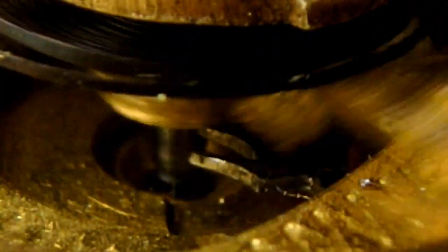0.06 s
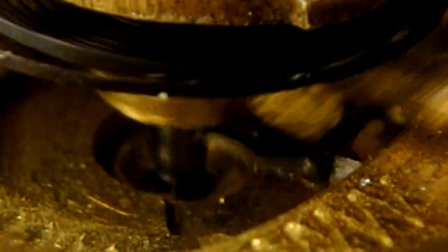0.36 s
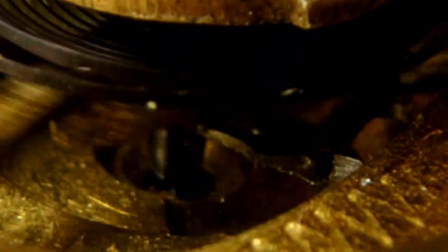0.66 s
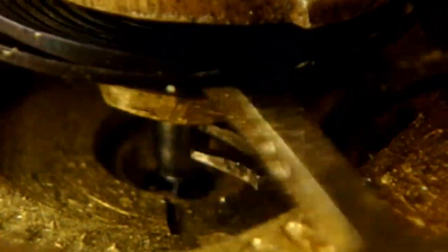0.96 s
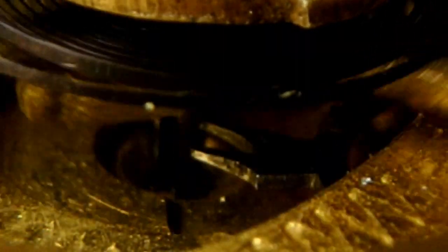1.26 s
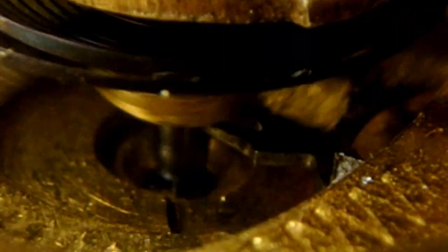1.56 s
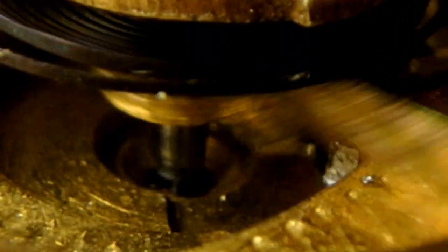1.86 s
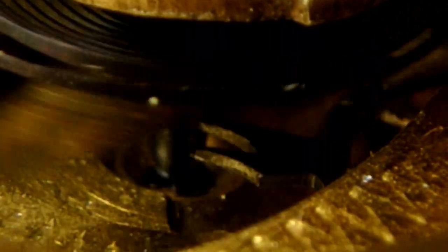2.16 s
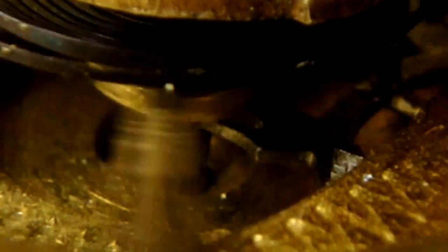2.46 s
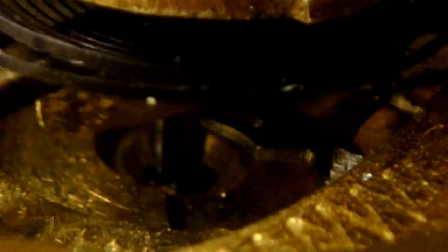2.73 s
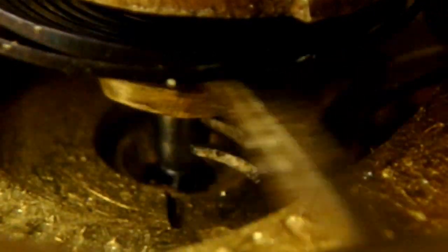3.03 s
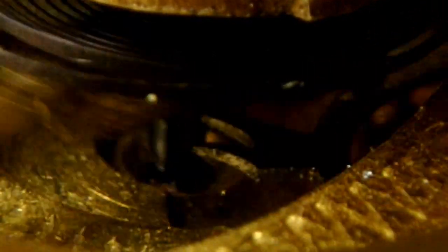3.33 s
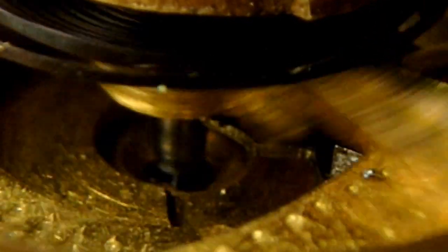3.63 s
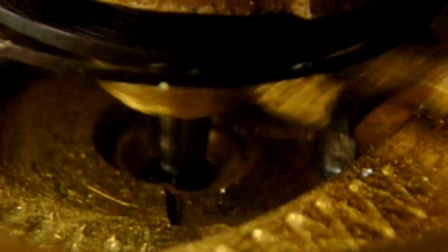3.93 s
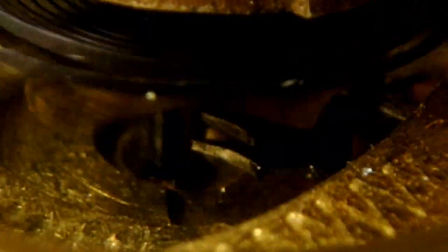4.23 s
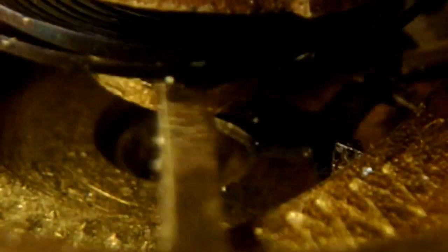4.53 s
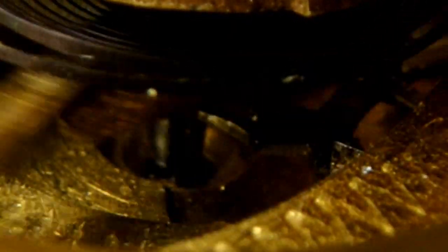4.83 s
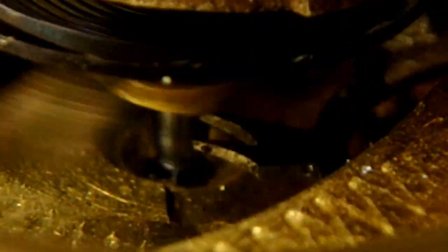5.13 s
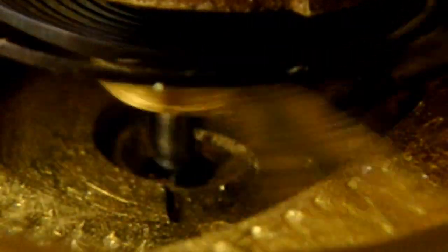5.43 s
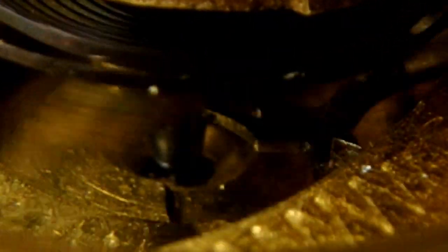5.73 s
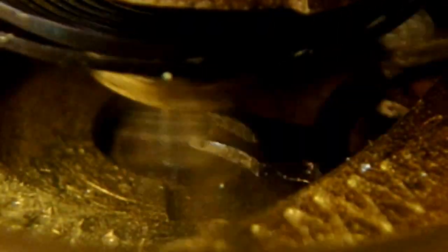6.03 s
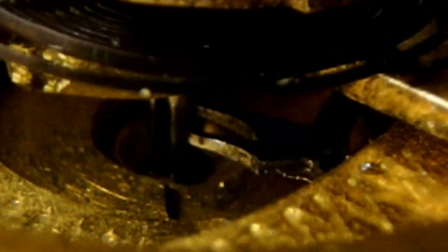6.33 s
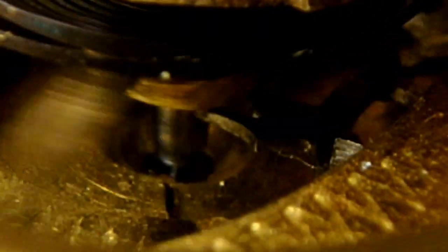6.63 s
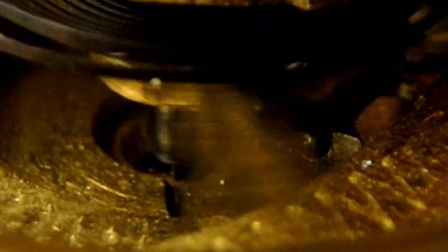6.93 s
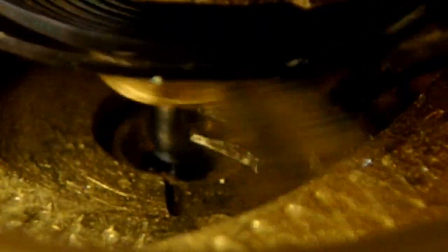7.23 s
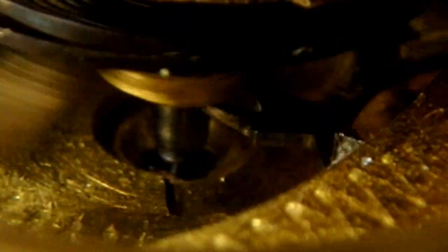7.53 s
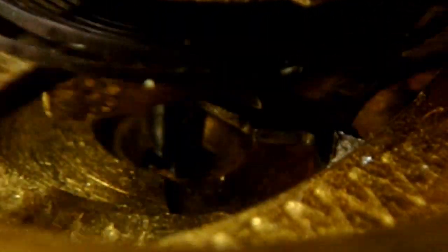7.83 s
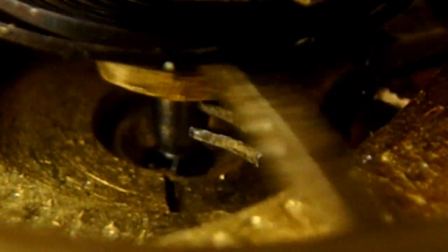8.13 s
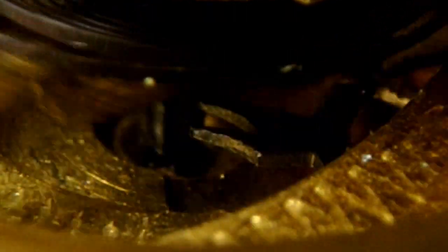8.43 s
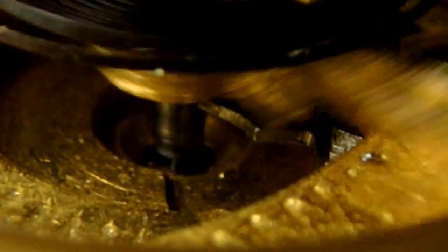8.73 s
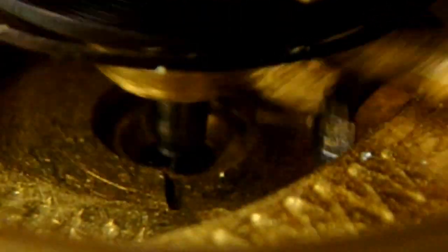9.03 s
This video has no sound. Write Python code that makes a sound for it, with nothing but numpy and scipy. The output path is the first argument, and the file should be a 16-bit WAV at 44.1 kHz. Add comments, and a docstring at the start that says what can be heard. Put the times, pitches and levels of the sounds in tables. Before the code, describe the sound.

Close, rapid ticking from a watch movement runs throughout, bright and metallic, in a repeating pattern of three light ticks, a harder tick and a quick extra click. Behind it is a quiet workshop with steady low hum and hiss. Moving air flutters against the right microphone early on, then bumps it twice past halfway while the watch keeps ticking.

```python
"""A mechanical watch on a workbench ticks close by from the start, about four beats a second, over room
air, hiss and mains hum. Steel strikes steel, the case clacks, the brass plate rings faintly. Three light
beats lead to a hard one that rebounds, then an extra click; the cycle repeats. From 0.8 s strong eddies
of a draught flutter on the right microphone; gusts thump on it at 4.6 and 5.8 s. At 5.9 s the hard beat
falls weak once and its click comes late; the ticking runs on to the end at 9 s."""
import sys
import numpy as np
from scipy import signal
from scipy.fft import rfft, irfft
from scipy.io import wavfile

SR = 44100
rng = np.random.default_rng(int(sys.argv[2]) if len(sys.argv) > 2 else 0)


def transcribe(u):
    """Save the signal u as a 16-bit wav file named by the first command-line argument.

    u: samples, shape (n,) or (channels, n), limited to [-1, 1]; the rate is SR.
    q: integer samples, one column per channel.
    """
    v = np.clip(np.atleast_2d(u).T, -1, 1)
    q = np.round(v * 32767).astype(np.int16)
    wavfile.write(sys.argv[1], SR, q)


N = 399987

# Three light beats, hard beat, extra click; later levels are relative to the first:
# (level [dB], body [dB], top modes [dB], unlock lead [s], unlock [dB], rebound delay [s], rebound [dB],
#  chatter [dB], bridge re body [dB], plate [dB], spring [dB])
STROKES = [(-27, -21, -14.4, .0068, -22, 0.0017, -5.5, -2, -5, -33, -28),
           (-28.6, -25, -12.5, 0.006, -36, .0017, -19, 2, -0.5, -33, -28),
           (-25.5, -24, -13.5, .013, -35, 0.0026, -19, -8.5, -2.5, -30, -35),
           (-24.5, -19.5, -17, .002, -10, 0.00404, -7, -11, 2, -28.5, -34),
           (-28.5, -16, -14, 0.00326, -16, 0.00153, -4, -12, -5.5, -60, -24)]
def watch(steel_db, case_db, slide_db, travel_s, case_lag_s, chatter_s, slide_s):
    """Each tick: unlocking, slide, chattering blow, rebound. Steel, case, plate and spring answer."""
    out = np.zeros((2, N))
    preroll_s = .015
    t = np.arange(SR // 5) / SR
    brief = t[:SR // 40]
    from_blow = brief - preroll_s
    for at_s, drive_db, stroke in beats(STROKES):
        (db, body_db, top_db, lead_s, unlock_db, rebound_s, rebound_db,
         chatter_db, bridge_db, plate_db, spring_db) = stroke
        force = amp(unlock_db) * chatter(from_blow + lead_s * rng.uniform(0.9, 1.48), chatter_s / 2)
        force += amp(slide_db) * chatter(from_blow + slide_s / 2, slide_s)
        force += np.sinc(from_blow * SR) + amp(chatter_db) * chatter(from_blow, chatter_s)
        force += amp(rebound_db) * chatter(from_blow - rebound_s * rng.uniform(0.9, 1.016), chatter_s / 2)
        force /= np.linalg.norm(force)
        body = bridge_and_case(brief, bridge_db, case_lag_s)
        click = amp(steel_db + drive_db) * escapement(brief, top_db)
        heard_s = at_s + travel_s
        case_drive_db = 0.24 * drive_db  # the heavy case feels only a share
        add(out, heard_s, amp(db + case_db + body_db + case_drive_db) * body)
        add(out, heard_s - preroll_s, amp(db) * signal.fftconvolve(force[None], click, axes=1))
        rings = amp(plate_db) * ring(t, hz=3166, t60_s=0.24, balance_db=5)
        rings += amp(spring_db) * ring(t, hz=10300, t60_s=0.1, balance_db=-1)
        add(out, heard_s, amp(db + 2 * rng.standard_normal()) * rings)
    return out


# Stroke onsets in a cycle: (time [s])
ONSETS_S = [.0592, .3286, .5678, .8361, .8743]
# Uneven running: (time [s], lateness [s])
LATENESS = [(0.06, 0.00058), (1.59, -0.00076), (1.86, 0.00091), (2.61, -0.0025), (2.88, 0.0002),
            (3.12, -0.0019), (3.9, 0.00096), (4.65, 0.001), (5.44, -0.0022), (5.68, -0.0068),
            (6.19, 0.0035), (6.7, 0.0025), (6.97, 0.0005), (7.99, -0.00011), (8.74, -0.0017),
            (9.01, -0.0002)]
# Wavering force: (time [s], level [dB])
DRIVE_DB = [(0.06, -0.7), (1.86, 1.4), (2.1, -2.2), (2.37, -0.1), (3.9, -0.5), (4.65, -1), (5.17, 2.8),
            (6.46, 0), (7.48, 2.5), (8.23, -1.0), (8.5, 1.8), (9.01, 0.4)]
def beats(strokes, cycle_s=1.0215, cycles=9):
    """The balance repeats four beats, slightly uneven in time and force, and stumbles once."""
    stumble_cycle, hard_stroke = 5, 3
    for cycle in range(cycles):
        for k, (onset_s, stroke) in enumerate(zip(ONSETS_S, strokes)):
            at_s = cycle * cycle_s + onset_s
            drive_db = curve(at_s, DRIVE_DB)
            at_s += curve(at_s, LATENESS)
            if cycle == stumble_cycle:
                drive_db -= 5.5 * (k == hard_stroke)
                at_s += .006 * (k > hard_stroke)
            yield at_s, drive_db, stroke


# First contact, steel parts, their top modes:
# (frequency [Hz], relative level [dB], swell [s], left-right [dB], left lead [rad])
CRACK_MODES = [(4860, -7.5, 0.000033, 5, -0.16)]
STEEL_MODES = [(4480, -27, 0.00074, 1, 1), (5130, -17, 0.00048, 13, -1.9), (5700, -16, 0.00075, -1, -0.75),
               (6166, -14.5, 0.0009, 8, -1.2), (7280, -8, 0.00056, -8.5, 0.77),
               (8340, -9, 0.00033, 2, 0.22), (8880, -15.5, 0.00088, -5, -0.35),
               (9580, -13, 0.00061, 4.5, 0.26)]
TOP_MODES = [(10270, -4, .0007, -5, 5.5), (11320, 0, 0.00087, 13, -4.5), (11600, 4.5, 0.00034, -6, 1),
             (13200, -15, .00015, 1, 2)]
def escapement(t, top_db, detune=.004):
    """Steel meets steel: a dry crack and a bright click of about 2 ms."""
    crack = strike(CRACK_MODES, t, scatter_db=4.0, detune=detune)
    click = strike(STEEL_MODES, t, scatter_db=-0.3, detune=detune)
    top = strike(TOP_MODES, t, scatter_db=1, detune=detune)
    return crack + click + amp(top_db) * top


# Escapement bridge; case and holder:
# (frequency [Hz], relative level [dB], swell [s], left-right [dB], left lead [rad])
BRIDGE_MODES = [(2562, 0.96, 0.003, 2.4, 0.31)]
CASE_MODES = [(813, -5.5, 0.0029, -5.5, 0), (1047, -15.5, 0.0064, 0, 0), (1170, 0.5, 0.0022, 0.5, .1),
              (1685, -6, 0.0015, -7, .2), (1797, -8, 0.0039, 6, .3), (2180, -16, 0.0017, 3, 0),
              (3300, -9.5, 0.0013, 10, 0)]
def bridge_and_case(t, bridge_db, case_lag_s):
    """The bridge pings; the heavier case takes the stroke as one push and clacks for about 10 ms."""
    ping = amp(bridge_db) * strike(BRIDGE_MODES, t, scatter_db=1.6, detune=0.0028)
    clack = strike(CASE_MODES, t - case_lag_s, scatter_db=0.5, detune=0.0048)
    return ping + clack


def strike(modes, t, scatter_db, detune):
    """One blow: modes swell and die, differ each time and reach the two microphones out of step."""
    t, out = np.maximum(t, 0), 0
    for k, (hz, db, swell_s, balance_db, lead_rad) in enumerate(modes):
        level, pitch = rng.standard_normal(2)
        envelope = t / swell_s * np.exp(1 - t / swell_s)
        phase = 2 * np.pi * hz * (1 + detune * pitch) * t + np.array([[lead_rad], [-lead_rad]]) / 2
        gain = (-1) ** k * amp(db + scatter_db * level) * sides(balance_db)
        out = out + gain * envelope * np.sin(phase)
    return out


def chatter(t, length_s):
    """A short run of tiny contacts, unit energy."""
    burst = rng.standard_normal(len(t)) * np.sin(np.pi * np.clip(t / length_s, 0, 1)) ** 2
    return burst / (np.linalg.norm(burst) + 1e-12)


def ring(t, hz, t60_s, balance_db):
    """Free decay of the plate or the spring."""
    return sides(balance_db) * np.exp(-np.log(1000) * t / t60_s) * np.sin(2 * np.pi * hz * t)


def bench(x, t60_s, wet_db, spread, lowpass_hz):
    """Short, dull scatter off the bench and the things on it, much alike on both sides."""
    t = np.arange(SR // 8) / SR
    tail = rng.standard_normal(len(t)) + spread * rng.standard_normal((2, len(t)))
    tail *= np.exp(-np.log(1000) * t / t60_s) * (t > .001)
    tail = signal.lfilter(*signal.butter(1, lowpass_hz, fs=SR), tail / np.linalg.norm(tail[0]))
    return x + amp(wet_db) * signal.fftconvolve(x, tail, axes=1)[:, :N]


# Strong eddies; larger gusts: (time [s], level [dB], half width [s])
EDDIES = [(0.8241, -14, 0.0015), (1.28, -21.5, 0.0033), (1.329, -24.5, 0.0076), (1.381, -23, 0.011),
          (1.446, -22, 0.0043), (5.318, -23.5, 0.0019), (5.374, -21.5, 0.0037), (5.434, -23.5, 0.011),
          (6.679, -25, 0.0019), (7.550, -27, 0.0081)]
GUSTS = [(4.576, -16.5, 0.0038), (5.8365, -12.5, 0.0057)]
# Rumble spectrum: (frequency [Hz], relative density [dB])
RUMBLE = [(8, -7.5), (22, 1), (48, -2), (75, -5.5), (120, -14.5), (250, -39), (600, -22.5), (2000, -77)]
# Draught strength: (time [s], level [dB])
DRAUGHT_DB = [(0, -43), (.9, -42.5), (1.4, -41), (2.2, -44), (4.2, -44.5), (5.4, -42.5), (6.1, -44.5),
              (7.6, -43), (9.07, -41.5)]
def draught(low_cut_hz, leak_db, rustle_db, rustle_hz):
    """Moving air rumbles on the right microphone; eddies pull at the diaphragm, gusts push it."""
    t = np.arange(N) / SR
    suction = np.zeros(N)
    for at_s, db, width_s in [*EDDIES, *small_eddies(DRAUGHT_DB)]:
        suction -= amp(db) * np.exp(-np.minimum(((t - at_s) / width_s) ** 2, 50))
    air = signal.lfilter(*signal.butter(1, low_cut_hz, "high", fs=SR), suction)  # diaphragm swings back
    rustle = signal.lfilter(*signal.butter(4, rustle_hz, fs=SR), rng.standard_normal(N))
    for at_s, db, width_s in GUSTS:
        offset_sq = np.minimum(((t - at_s) / width_s) ** 2, 50)
        envelope = amp(db) * np.exp(-offset_sq / 2)
        air += envelope * (1 - offset_sq + amp(rustle_db + db) * rustle)  # stronger gusts rustle more
    air += amp(curve(t, DRAUGHT_DB)) * noise(RUMBLE)
    return np.array([amp(leak_db) * air, air])


def small_eddies(strength, count=10, above_db=16.5, scatter_db=2, width_s=.004):
    """Weak eddies at random times, following the draught's strength."""
    for place, level, size in rng.uniform(-1, 1, (count, 3)):
        at_s = (place + 1) / 2 * N / SR
        yield at_s, curve(at_s, strength) + above_db - scatter_db * level, width_s * 2 ** size


# Room air; microphone hiss: (frequency [Hz], relative density [dB])
AIR = [(15, -12), (50, 1), (110, 1), (200, -3.5), (400, -8), (700, -13.5), (1050, -15.5), (1500, -20),
       (2200, -23), (2800, -26), (3800, -27.5), (6500, -34), (16000, -37)]
HISS = [(1500, -14.5), (2800, -15.5), (3200, 4), (3800, -23), (4500, -25), (5700, -5), (6700, -7.5),
        (9000, -2.5), (11000, 1.5), (13500, 2.5), (14800, -1.5), (15700, -2.5)]
# Likeness of the two sides: (frequency [Hz], common power share [0-1])
COHERENCE = [(100, 0.01), (400, 0.11), (2800, 0.17), (6500, 0.22), (7500, 0.3), (12000, 0.13),
             (14000, 0.25), (15000, 0.4), (15600, .95)]
def room(air_db, hiss_db):
    """Steady air noise and hiss, partly common to both microphones."""
    common, *own = [rfft(amp(air_db) * noise(AIR) + amp(hiss_db) * noise(HISS)) for _ in range(3)]
    share = curve(np.fft.rfftfreq(N, 1 / SR), COHERENCE)
    return irfft(np.sqrt(share) * common + np.sqrt(1 - share) * np.array(own), N)


# Hum and whine lines: (frequency [Hz], left [dB], right [dB])
HUM_LINES = [(102.3, -81, -59), (199.8, -55, -68.5), (298.4, -68.5, -63.5), (500, -74, -63),
             (5595, -74.5, -107), (11700, -79, -85)]
def hum(waver_rad, waver_db):
    """Mains hum and faint electronic whine, wavering in phase and level."""
    t = np.arange(N) / SR
    out = np.zeros((2, N))
    for hz, left_db, right_db in HUM_LINES:
        tone = np.sqrt(2) * np.sin(2 * np.pi * hz * t + waver_rad * drift(6))
        tone *= amp(waver_db * drift(6.3))
        out += amp([[left_db], [right_db]]) * tone
    return out


# Hiss band: (frequency [Hz], relative density [dB])
SHIMMER_BAND = [(3600, -41), (4000, 0.5), (4270, 3), (4550, -3), (5000, -29)]
# Its strength: (time [s], level [dB])
SHIMMER_DB = [(0, -74), (.5, -65), (1.3, -71), (2, -69), (2.5, -70), (5, -71.5), (6, -69.5), (8.3, -72.5),
              (8.75, -67), (9.07, -69)]
def shimmer(balance_db):
    """A faint, narrow hiss near 4.3 kHz that comes and goes."""
    level = amp(curve(np.arange(N) / SR, SHIMMER_DB))
    return sides(balance_db) * level * noise(SHIMMER_BAND)


def noise(spectrum):
    """Shaped noise, rms 1."""
    hz, db = np.transpose(spectrum)
    shape = amp(np.interp(np.log(np.fft.rfftfreq(N, 1 / SR) + 1), np.log(hz), db))
    x = irfft(rfft(rng.standard_normal(N)) * shape, N)
    return x / np.sqrt(np.mean(x ** 2) + 1e-20)


def drift(rate_hz):
    """Slow random wander."""
    knots = rng.standard_normal(400)
    return np.interp(np.arange(N) / SR * rate_hz, np.arange(len(knots)), knots)


def curve(x, table):
    """Linear lookup in a two-column table."""
    return np.interp(x, *np.transpose(table))


def amp(db):
    """Decibels to gain."""
    return 10 ** (np.asarray(db) / 20)


def sides(db):
    """Stereo gains for a left-right level difference."""
    return amp(np.array([[db], [-db]]) / 2)


def add(mix, at_s, sound):
    """Mixes in a stereo sound."""
    part = mix[:, max(round(at_s * SR), 0):][:, :sound.shape[1]]
    part += sound[:, :part.shape[1]]


def scene():
    """Watch on its bench, background, draught."""
    ticking = watch(steel_db=-0.5, case_db=1.0, slide_db=-28.0, travel_s=.0004,
                    case_lag_s=0.001497, chatter_s=0.0014, slide_s=0.015)
    ticking = bench(ticking, t60_s=0.095, wet_db=-9.5, spread=0.26, lowpass_hz=5040)
    background = room(air_db=-45.5, hiss_db=-56) + hum(waver_rad=1.0, waver_db=1.34)
    background += shimmer(balance_db=4.1)
    return ticking + background + draught(low_cut_hz=18, leak_db=-29, rustle_db=-14.5, rustle_hz=7820)


# Sound-path notches: (frequency [Hz], width [Hz])
NOTCHES = [(2040, 66), (3050, 104), (4100, 44), (5120, 69), (6160, 200)]
def record(dry):
    """The camera's sound path: narrow notches, each applied twice, then a band limit."""
    for hz, width_hz in NOTCHES:
        notch = signal.iirnotch(hz, hz / width_hz, fs=SR)
        dry = signal.lfilter(*notch, signal.lfilter(*notch, dry))
    lowpass = signal.firwin(1023, cutoff=15780, window=("kaiser", 7), fs=SR)
    return signal.oaconvolve(dry, lowpass[None], "same")


dry = scene()
out = record(dry)
transcribe(out)
```